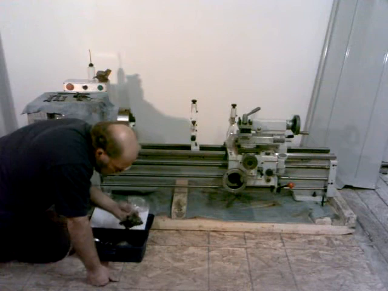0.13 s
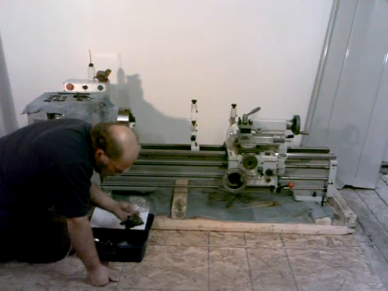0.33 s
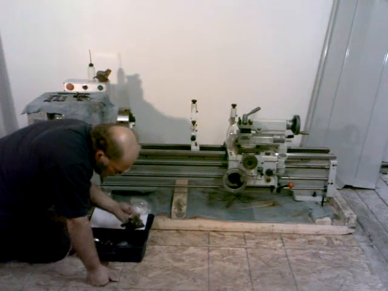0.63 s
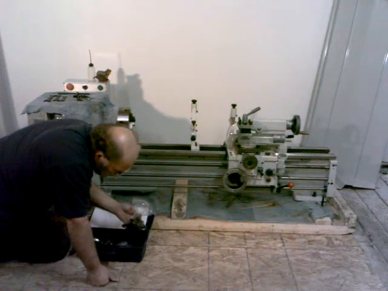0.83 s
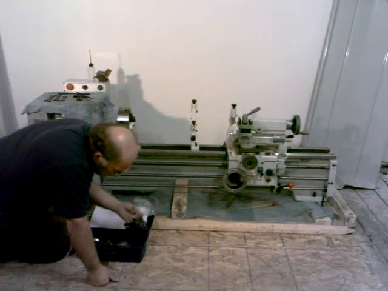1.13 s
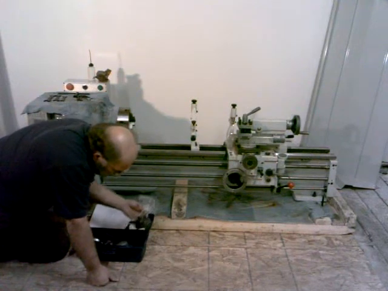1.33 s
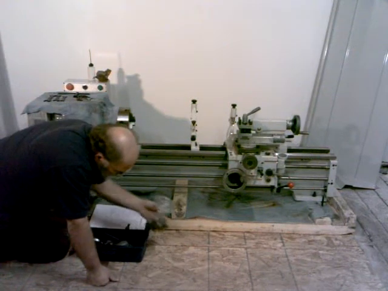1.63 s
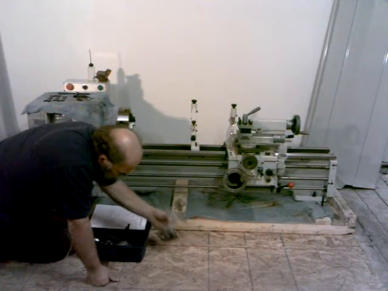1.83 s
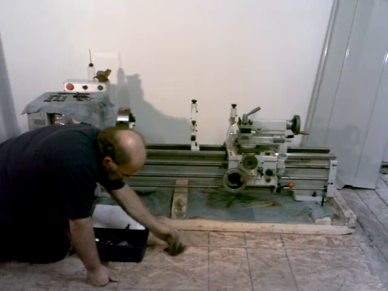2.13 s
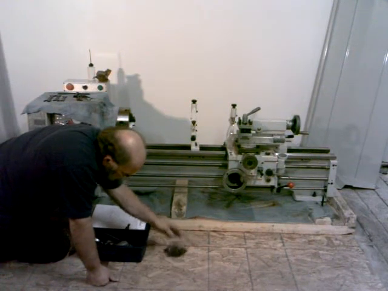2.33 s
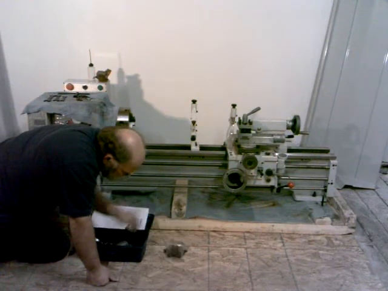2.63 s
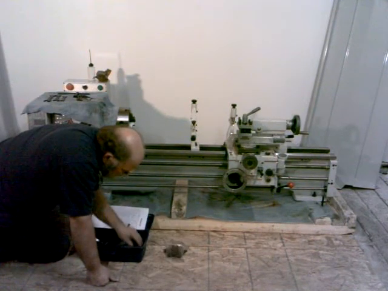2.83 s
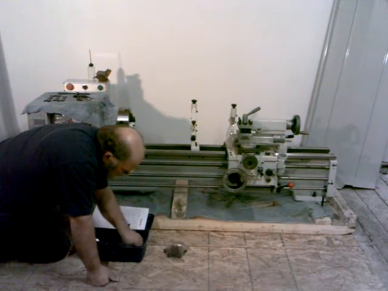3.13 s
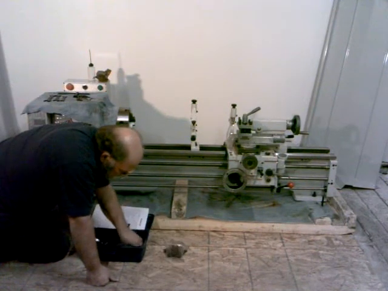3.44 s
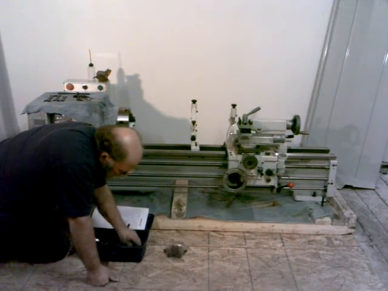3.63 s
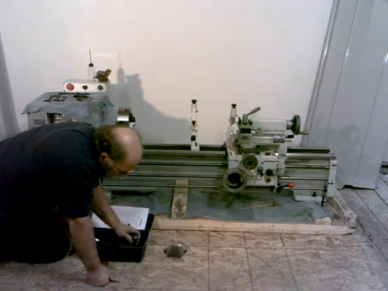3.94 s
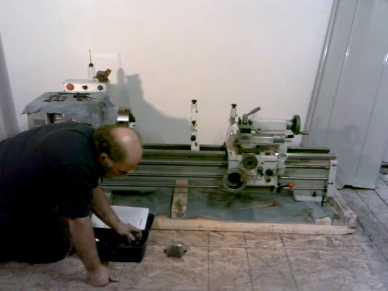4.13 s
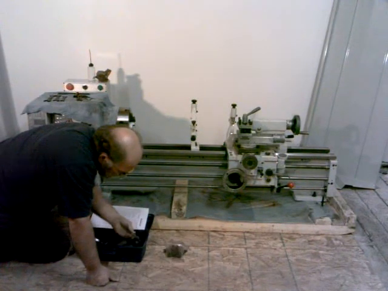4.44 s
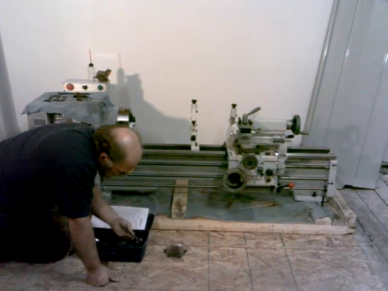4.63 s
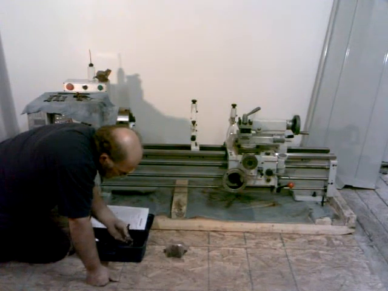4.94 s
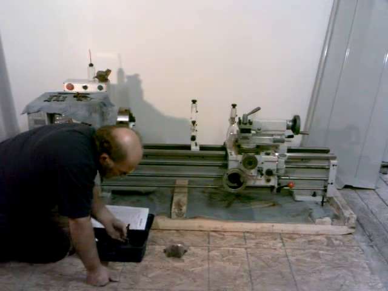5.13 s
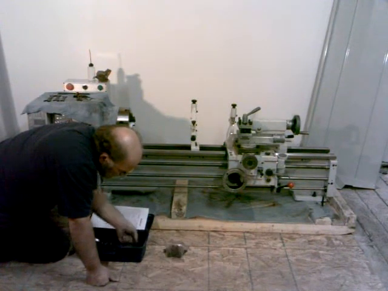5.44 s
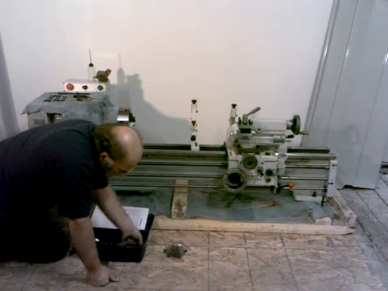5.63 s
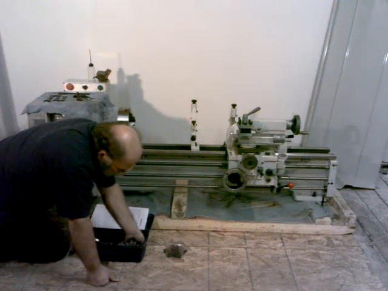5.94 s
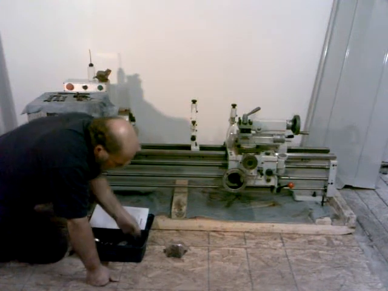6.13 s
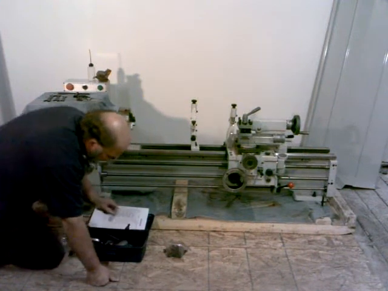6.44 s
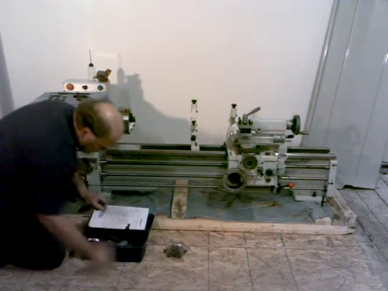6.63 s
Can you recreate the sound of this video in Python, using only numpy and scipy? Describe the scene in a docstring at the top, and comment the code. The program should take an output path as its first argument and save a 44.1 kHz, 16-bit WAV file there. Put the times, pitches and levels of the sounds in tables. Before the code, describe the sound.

Steel hand tools clink and knock as someone sorts through a plastic toolbox in a small, bare workshop. A heavy metal part is set down and rocks briefly on the floor tiles. The rummaging resumes with hollow knocks and a thud, builds to a loud clatter, then thins to light clinks and soft bumps. The microphone is a few metres away, with faint hiss and low rumble underneath.

```python
"""A small, bare workshop, one camera microphone a few metres from a plastic toolbox.
Someone sorts through steel hand tools. They land end after end; each contact chatters, rings the
steel, knocks the box and thuds through to the floor. One heavy part rocks to rest on the tiles.
The walls smear every blow. Under it all lie the camera's hiss, low rumble and faint pulsing whine."""
import sys
import numpy as np
from scipy import signal
from scipy.fft import rfft, irfft, next_fast_len
from scipy.io import wavfile

SR = 44100
rng = np.random.default_rng(int(sys.argv[2]) if len(sys.argv) > 2 else 0)


def generate_wav(signal):
    """Clip the signal to [-1, 1] and save it as 16-bit WAV at the path in sys.argv[1]."""
    frames = np.transpose(np.atleast_2d(signal))
    scaled = np.clip(frames, -1, 1) * 32767
    pcm = np.round(scaled).astype(np.int16)
    wavfile.write(sys.argv[1], SR, pcm)


N = 298546
TAIL = np.arange(int(.6 * SR)) / SR  # seconds since a blow


def clatter(pinned_s=.033, shake_s=.04):
    """Tools land in the box; the heftier the blow, the duller its knock and the more the floor shakes."""
    # Each row: start in seconds, steel clack and box knock in relative dB,
    # heft from 0 (glances off the tray) to 1 (lands on the bottom).
    landings = [(0.002, -49.5, -57, 0.76), (0.085, -41.5, -48, 0.7), (0.1582, -24.5, -35, 0.53),
                (0.245, -30, -42, 0.44), (0.469, -53, -61, 0.56), (0.5, -31, -32, 0.13),
                (0.68, -55.5, -61.5, 0.18), (1.217, -44, -60, 0.26), (1.235, -38.5, -56.5, 0.52),
                (2.859, -67, -51, 0.66), (2.909, -52, -53, 0.73), (3.0024, -36, -37, 0.29),
                (3.113, -43, -54, 0.78), (3.174, -35, -38, 0.72), (3.3072, -32, -32.5, 0.69),
                (3.3233, -33, -26.5, 0.83), (3.345, -33, -33, 0.48), (3.6339, -30, -36.5, 0),
                (3.652, -29, -33, 0), (4.449, -57.5, -79.5, 0), (4.504, -32.5, -32, .8),
                (4.5564, -22.5, -22.5, .6), (4.681, -23, -22, 0.68), (4.739, -22.5, -29.5, 0.17),
                (4.7525, -20.5, -19, 0.55), (4.785, -26, -27, 0.66), (4.82, -24, -25.5, 0.17),
                (4.866, -32.5, -30.5, 0.038), (4.9, -41, -44.5, 1), (5.588, -40.5, -50, 0),
                (5.783, -70, -59.5, 0.7), (5.871, -55, -60.5, 0.5), (5.965, -40, -49.5, 0),
                (6.095, -53, -57.5, 0.03), (6.246, -57.5, -65.5, 0.32)]
    out = np.zeros(N)
    between = np.diff([row[0] for row in landings], prepend=-np.inf, append=np.inf)
    nearest_gaps = np.minimum(between[:-1], between[1:])
    for (s, clack_db, knock_db, heft), gap in zip(landings, nearest_gaps):
        thud_db = knock_db + np.interp(heft, (0, 1), (-29, 3.5))
        shake_db = thud_db + np.interp(heft, (0, 1), (-19.5, -13.5))
        knock_tilt = np.interp(heft, (0, 1), (8, -9.5))
        # the less of a blow the box takes, the brighter the steel
        clack_tilt = 1.78 + 0.06 * (clack_db - knock_db)
        pinned = gap < pinned_s  # tools that land together pin each other
        add(out, s, landing(clack_db, knock_db, thud_db, clack_tilt, knock_tilt, pinned))
        add(out, s, undb(shake_db) * floor_rumble(shake_s))
    return out


def landing(clack_db, knock_db, thud_db, clack_tilt, knock_tilt, pinned, lag_s=.022, second_db=-5.5):
    """One end strikes; unless the tool is pinned, the other follows, weaker and with a thinner knock."""
    out = contact(clack_db, knock_db, thud_db, clack_tilt, knock_tilt)
    if not pinned:
        second_end = contact(clack_db, knock_db, thud_db, clack_tilt, knock_tilt + 5.5)
        add(out, lag_s * (1 + .15 * rng.uniform(-1, 1)), undb(second_db) * second_end)
    return out


def contact(clack_db, knock_db, thud_db, clack_tilt, knock_tilt):
    """One chattering blow sounds steel, box and floor; the tilts brighten it, in dB per octave."""
    blows = chatter()
    # tool, box and floor radiate from different places, so each has its own reflections
    from_tool, from_box, from_floor = (
        signal.fftconvolve(blows, workshop())[:len(TAIL)] for _ in range(3))
    steel = undb(clack_db - 4.5) * steel_clack(from_tool, clack_db, clack_tilt)
    box = undb(knock_db - 6.5) * box_knock(from_box, knock_tilt)
    floor = undb(thud_db - 5) * floor_thud(from_floor)
    return steel + box + floor


def chatter(length_s=.02, bounce_db=-12, weaken_db=8, scatter_db=4, spread_s=.003, count=4):
    """A first blow and a few uneven, weakening rebounds."""
    size = 4096
    blows = np.zeros(size)
    blows[0] = 1
    place = (np.arange(count) + rng.random(count)) / count
    at = (length_s * place * SR).astype(int) + 1
    rebound_db = bounce_db - weaken_db * place + scatter_db * rng.standard_normal(count)
    blows[at] += undb(rebound_db) * rng.choice([-1, 1], count)
    # bending waves leave the tool a little earlier or later at each pitch
    delay = spread_s * np.interp(np.linspace(0, 31, size // 2 + 1), np.arange(32), rng.random(32))
    return irfft(rfft(blows) * np.exp(-2j * np.pi * np.cumsum(delay) * SR / size))


def steel_clack(blows, clack_db, tilt, ring_db=-6.5, full_blow_db=-24):
    """Steel clacks on steel and rings; only hard blows snap in the top octave."""
    # The tools' modes. Each row: pitch in Hz, level in dB, time to fall 60 dB in seconds.
    steel_modes = [(1131, -4, .25), (1273, -4, .25), (1399, -3, .22), (1462, -2, .22), (1698, 0, .25),
                   (1782, 1, .24), (1997, -7, .2), (2479, -4, .22), (2549, -1, .22), (2632, -2, .22),
                   (2819, -2, .22), (3040, -4, .22), (3681, -6, .22), (3831, -6, .22), (4043, -6, .22),
                   (4225, -6, .24)]
    # The spectra of the clack and the snap. Each row: frequency in Hz, level in dB.
    clack_spectrum = [(400, -19.5), (1050, -6.5), (1250, -2.5), (1530, 0), (1730, 2), (2170, -8),
                      (2650, 0.5), (3450, -7), (4150, -5), (5100, -14.5), (6000, -26), (7000, -36.5),
                      (9500, -33.5), (15000, -43.5)]
    snap_spectrum = [(4000, -55), (8000, -13.5), (10500, -0.5), (15000, 0)]
    clack = struck(colour(blows, clack_spectrum, tilt))
    ringing = ring(steel_modes, tilt, pivot_hz=2600, scatter_db=3, detune=.003)
    snap = struck(colour(blows * fade(.12), snap_spectrum))
    snap_db = -25 + .8 * (clack_db - full_blow_db)
    return clack + undb(ring_db) * ringing + undb(snap_db) * snap


def box_knock(blows, tilt, ring_db=-2.5):
    """The plastic walls knock and ring hollow."""
    # The walls' modes. Each row: pitch in Hz, level in dB, time to fall 60 dB in seconds.
    box_modes = [(527, 0, .3), (565, 2, .24), (614, -2, .24), (722, -3, .32), (819, 2, .34), (897, 0, .32),
                 (956, -4, .28), (1023, -6, .28)]
    # The knock's spectrum. Each row: frequency in Hz, level in dB.
    knock_spectrum = [(150, -42), (400, -7.5), (500, -4.5), (590, 1.5), (690, -1), (840, -0.5), (970, -8),
                      (1120, -8.5), (1600, -23.5), (4000, -54)]
    knock = struck(colour(blows, knock_spectrum, tilt, pivot_hz=677))
    return knock + undb(ring_db) * ring(box_modes, tilt, pivot_hz=700, scatter_db=2, detune=.0029)


def floor_thud(blows):
    """The weight of a blow carries through to the floor as a dull thud."""
    # The thud's spectrum. Each row: frequency in Hz, level in dB.
    thud_spectrum = [(25, -10), (70, -18), (130, -12.5), (200, -7), (330, -5), (500, -3.5), (700, -21),
                     (1500, -30.5), (4000, -63.5)]
    return struck(colour(blows, thud_spectrum))


def ring(modes, tilt, pivot_hz, scatter_db, detune, rise_s=.0038):
    """Each blow lands on another spot and weights the modes anew; hard contact favours the high ones."""
    out = 0
    for hz, db, t60 in modes:
        size, shift, turn = rng.standard_normal(3)
        gain = undb(db + tilt * np.log2(hz / pivot_hz) + scatter_db * size)
        phase = 2 * np.pi * hz * (1 + detune * shift) * TAIL + np.pi * turn
        out = out + gain * fade(t60) * np.sin(phase)
    return struck(out * (1 - np.exp(-TAIL / rise_s)))


def heavy_part(weight_lag_s=.02, shake_db=-14, shake_s=.075):
    """A part rocks on the tiles, edge first; its weight shakes the floor and rings its high modes."""
    # Each row: start in seconds, steel clack and floor thud in relative dB, clack tilt in dB per octave.
    rocks = [(1.971, -32.5, -45, -3.5), (2.036, -38, -34, 0.5), (2.267, -40, -39, -1.5),
             (2.373, -57.5, -49, 8), (2.419, -50.5, -57, 2.5)]
    # The part's modes. Each row: pitch in Hz, level in dB against the row's thud, decay in seconds.
    part_modes = [(10100, -29, 0.38), (13550, -39, .2)]
    out = np.zeros(N)
    for s, clack_db, thud_db, clack_tilt in rocks:
        edge = (0, clack_db, thud_db - 5.5)
        weight = (weight_lag_s, clack_db - 3.5, thud_db)
        for lag_s, steel_db, floor_db in (edge, weight):
            knock_db = (steel_db + floor_db) / 2 - .5
            add(out, s + lag_s, contact(steel_db, knock_db, floor_db, clack_tilt, knock_tilt=1.5))
        add(out, s, undb(thud_db + shake_db) * floor_rumble(shake_s))
        for hz, db, t60 in part_modes:
            add(out, s, undb(thud_db + db) * ping(hz, t60, rise_s=.026, blur=1.6))
    return out


def rummage(start_s=3.385, length_s=.25, scatter_db=2.2, count=6):
    """A hand pushes through the tools and they jostle at random, mostly steel on steel."""
    out = np.zeros(N)
    for k in range(count):
        touch = contact(clack_db=-38.3, knock_db=-51.5, thud_db=-58.5, clack_tilt=1.5, knock_tilt=8)
        s = start_s + length_s * (k + rng.random()) / count
        add(out, s, undb(scatter_db * rng.standard_normal()) * touch)
    return out


def loose_steel(slim_tool_hz=7840):
    """Loose parts tick and ring on freely; one slim tool sings the same high note when nudged."""
    # The loose parts. Each row: start in seconds, pitch in Hz, level in dB.
    ticks = [(0.16, 1800, -32), (0.681, 1404, -60.5), (0.832, 1380, -64), (1.234, 1635, -53.5)]
    # The slim tool. Each row: start in seconds, level in dB.
    nudges = [(0.421, -72), (3.174, -77), (3.32, -73), (4.447, -62), (4.508, -52), (4.62, -63), (4.74, -51)]
    out = np.zeros(N)
    for s, hz, db in ticks:
        add(out, s, undb(db) * ping(hz, t60=.16, rise_s=.014, blur=2.4))
    for s, db in nudges:
        add(out, s, undb(db) * ping(slim_tool_hz, t60=.41, rise_s=.0084, blur=.9))
    return out


def ping(hz, t60, rise_s, blur):
    """One clear mode; rebounds and reflections make the ring waver."""
    tone = np.sin(2 * np.pi * hz * TAIL) * fade(t60)
    reflections = rng.standard_normal(len(TAIL)) * fade(t60)
    echo = signal.fftconvolve(tone * fade(.046), reflections)[:len(TAIL)]
    return struck((unit(tone) + blur * unit(echo)) * (1 - np.exp(-TAIL / rise_s)))


def floor_bumps():
    """Knee and box bump the floor as weight shifts."""
    # Each row: start in seconds, level in dB, rough length in seconds.
    bumps = [(3.322, -30, 0.052), (5.435, -55, 0.16), (5.962, -52.5, .2), (6.231, -43, 0.032),
             (6.418, -52, .04)]
    out = np.zeros(N)
    for s, db, length_s in bumps:
        add(out, s, undb(db) * floor_rumble(length_s))
    return out


def floor_rumble(length_s):
    """A short, deep swell in the floor."""
    # The shaken floor's spectrum. Each row: frequency in Hz, level in dB.
    rumble_spectrum = [(15, -8), (28, -2), (40, -3.5), (50, -7), (62, -20.5), (120, -35), (400, -72)]
    age = 2 * TAIL / length_s
    swell = colour(rng.standard_normal(len(TAIL)) * age * np.exp(-age), rumble_spectrum)
    return np.sqrt(2) * swell / np.abs(swell).max()


def workshop(direct=.4, hold_s=.02, t60=.26, late_db=-31, late_t60=.83, build_s=.018):
    """The room from a few metres: direct sound, echoes that thicken, a quick decay, a weak late tail."""
    density = np.clip(.024 + (TAIL / build_s) ** 2, 0, 1)
    echoes = rng.standard_normal(len(TAIL)) * (rng.random(len(TAIL)) < density) / np.sqrt(density)
    echoes *= np.minimum(undb(-60 * (TAIL - hold_s) / t60), 1) + undb(late_db) * fade(late_t60)
    echoes /= np.sqrt(np.sum(echoes ** 2))
    echoes[0] = direct
    return echoes


def camera_noise(hiss_db=-61, frame_hz=15.23):
    """The camera's own hiss and rumble, a whine that chirps with its frames, and a few steady tones."""
    # The spectrum of hiss and rumble. Each row: frequency in Hz, relative level in dB.
    hiss_spectrum = [(12, -11.5), (25, 11), (46, 3), (62, -2.5), (115, -8.5), (200, -13), (400, -15.5),
                     (800, -19.5), (2100, -23.5), (2900, -21), (4300, -23.5), (6000, -27), (15000, -26)]
    # The whine. Each row: pitch and bandwidth in Hz, level at the crest in dB, place in the
    # frame from 0 to 1, half-height length as a share of the frame, share of frames that sound.
    chirps = [(3800, 130, -73, .13, .5, .9), (4250, 300, -73, .56, .36, .9), (9600, 350, -72, .38, .2, .45),
              (14150, 650, -70.5, .57, .26, 1), (13500, 300, -72, .77, .16, 1)]
    # The steady tones. Each row: pitch and bandwidth in Hz, level in dB.
    tones = [(14713, 1, -77.5), (3182, 50, -86), (1023, 30, -89), (2939, 50, -90), (7850, 40, -94)]
    out = undb(hiss_db) * unit(colour(rng.standard_normal(N), hiss_spectrum))
    for hz, width_hz, db, place, share, chance in chirps:
        frame, within = np.divmod(np.arange(N) / SR * frame_hz - place + .5, 1)
        sounding = rng.random(int(N / SR * frame_hz) + 2)[frame.astype(int)] < chance
        pulse = np.cos(np.pi / 2 * np.clip((within - .5) / share, -1, 1)) ** 2
        out += undb(db) * jittering_tone(hz, width_hz) * pulse * sounding
    for hz, width_hz, db in tones:
        out += undb(db) * jittering_tone(hz, width_hz)
    return out


def jittering_tone(hz, width_hz):
    """A tone of even strength whose pitch jitters within a narrow band, rms 1."""
    n = next_fast_len(N)
    band = np.exp(-2 * ((np.arange(n) * SR / n - hz) / width_hz) ** 2)
    noise = np.fft.ifft(band * np.exp(2j * np.pi * rng.random(n)))[:N]
    return unit(np.cos(np.angle(noise)))


def colour(x, points, tilt=0, pivot_hz=2600):
    """Causal filter through (Hz, dB) points, tilted over an octave each side of a pivot."""
    n = 2 * next_fast_len(len(x) // 2 + 2048)
    octave = np.log2(np.maximum(np.arange(n // 2 + 1) * SR / n, 1))
    hz, db = np.transpose(points)
    db = np.interp(octave, np.log2(hz), db) + tilt * np.clip(octave - np.log2(pivot_hz), -1, 1)
    # minimum phase, so nothing sounds ahead of a blow
    cepstrum = irfft(np.log(undb(db)))
    cepstrum[1:n // 2] *= 2
    cepstrum[n // 2 + 1:] = 0
    return irfft(rfft(x, n) * np.exp(rfft(cepstrum)))[:len(x)]


def fade(t60):
    """Exponential decay that falls 60 dB in t60 seconds."""
    return undb(-60 * TAIL / t60)


def undb(db):
    """Decibels to gain."""
    return 10 ** (np.asarray(db) / 20)


def unit(x):
    """Scale to rms 1."""
    return x / np.sqrt(np.mean(x ** 2))


def struck(x):
    """Scale a blow to rms 1 over its first 30 ms."""
    return x / np.sqrt(np.mean(x[:int(.03 * SR)] ** 2))


def add(out, s, x):
    """Mix x into out from s seconds on."""
    i = max(int(s * SR), 0)
    out[i:i + len(x)] += x[:max(len(out) - i, 0)]


def scene():
    """Everything at the one microphone, over the camera's own noise."""
    return (camera_noise() + clatter() + rummage() + heavy_part() + loose_steel() + floor_bumps())[None]


def record(dry):
    """The camera cuts the top steeply."""
    top_hz = 15650
    return signal.sosfilt(signal.ellip(10, .2, 80, top_hz, fs=SR, output="sos"), dry)


dry = scene()
out = record(dry)
generate_wav(out)
```